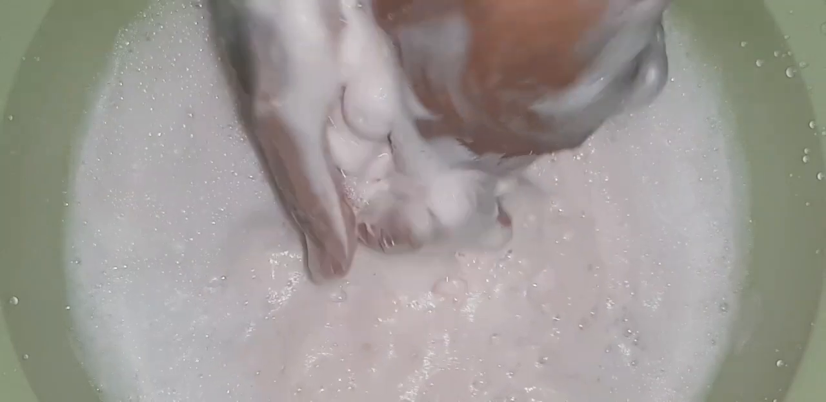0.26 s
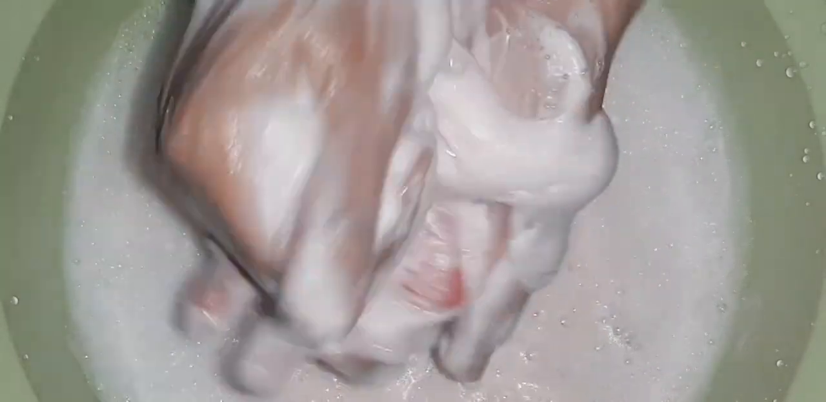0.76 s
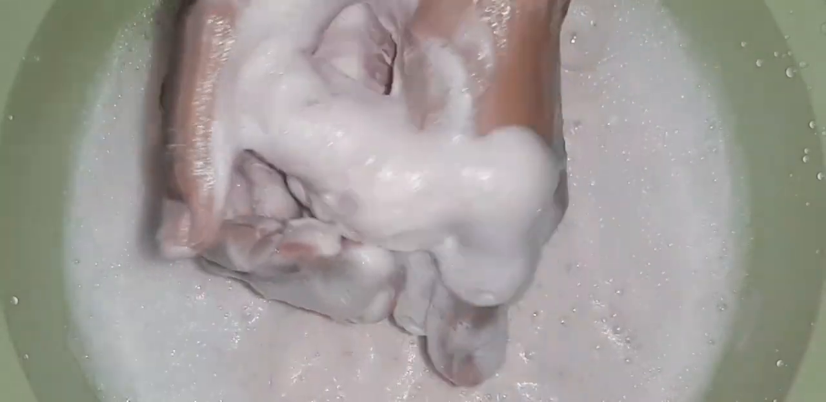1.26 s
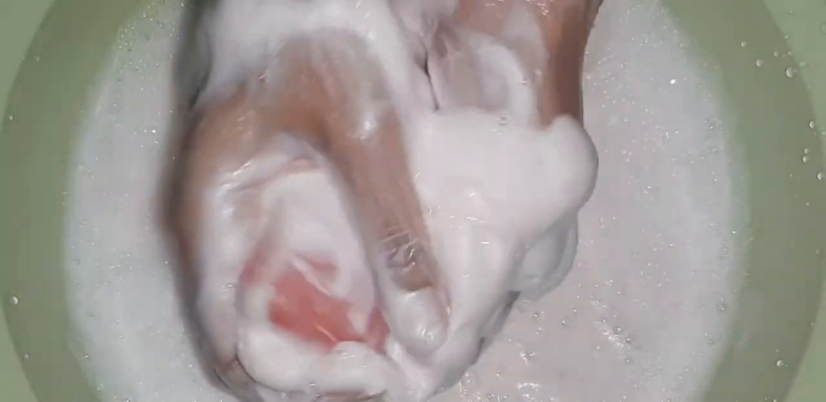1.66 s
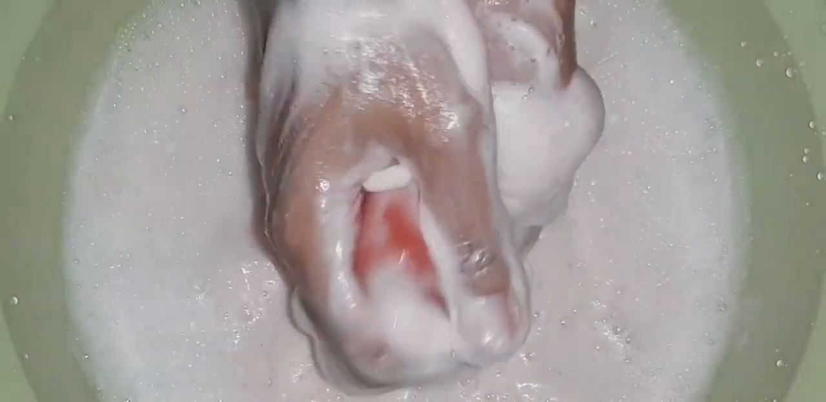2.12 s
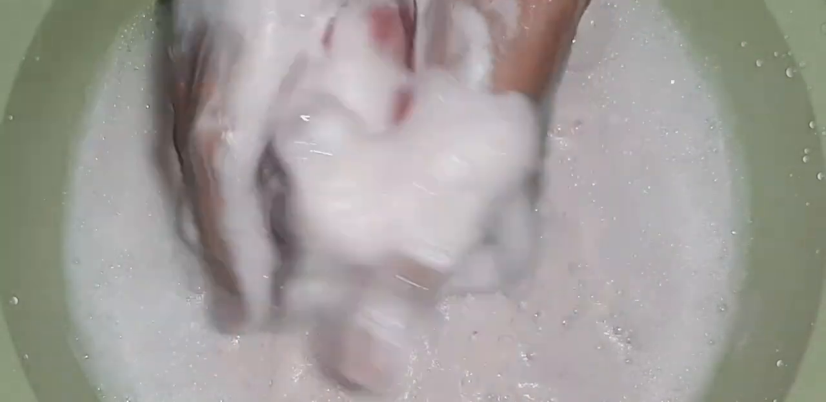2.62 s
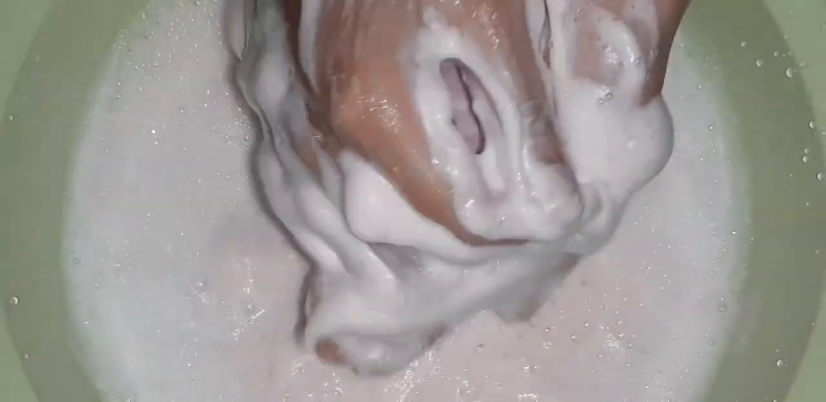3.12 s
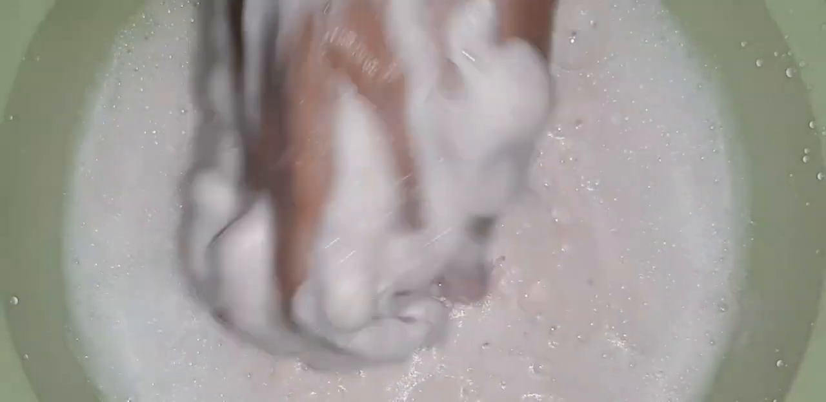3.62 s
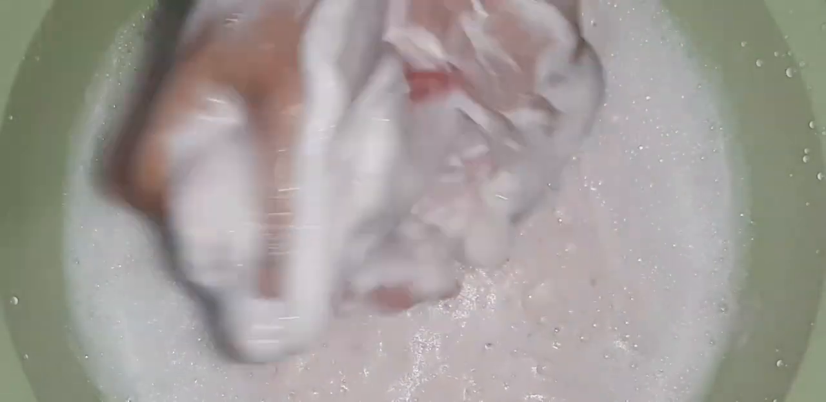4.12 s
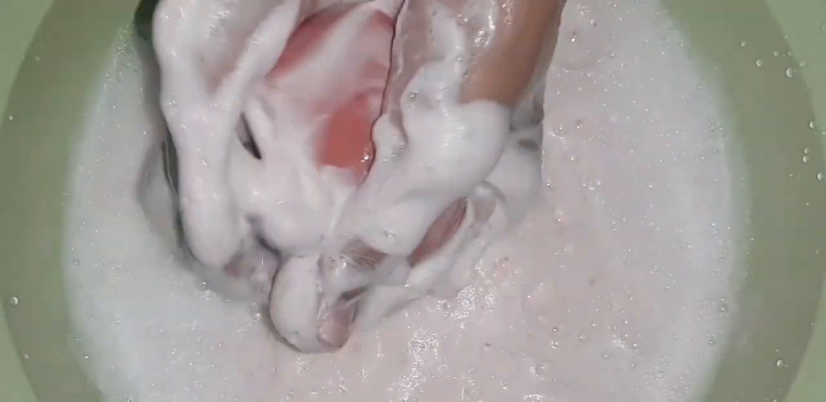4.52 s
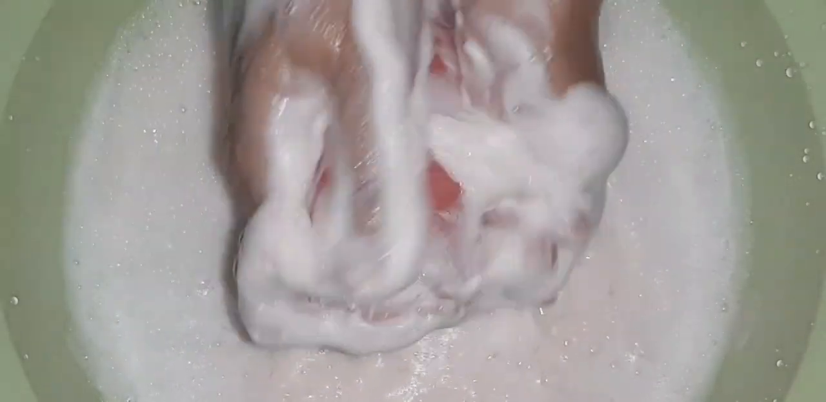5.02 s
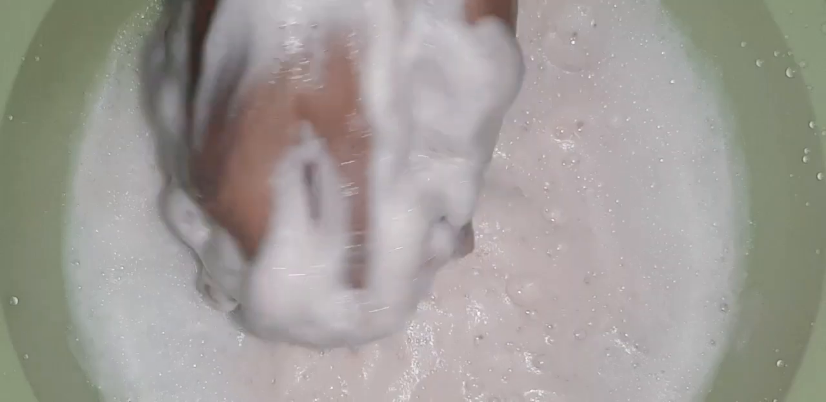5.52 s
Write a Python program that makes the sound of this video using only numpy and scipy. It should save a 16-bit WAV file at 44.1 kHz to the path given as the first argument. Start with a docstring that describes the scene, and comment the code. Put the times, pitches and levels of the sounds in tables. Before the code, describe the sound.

Close, slippery squeezing of lather: squelching bursts, ticking bubbles and crushed-foam crackle above softly sloshing water, in a small quiet room.

```python
"""Wet hands knead a foamy bar of soap over a plastic basin of suds, close to the microphone.
Throughout, a slowly growing fan drone and a thin hiss (both shaped noise) lie behind the hands.
From the first moments squeezes slosh water and crush foam (filtered clicks), and pockets pop (chirps).
From about 1 s wet squelches (paired chirps with a snap) and a thin whistle (gliding noise band) join in.
The hardest spurt, near 4.8 s, throws bright mist; basin and small room ring briefly after each sound."""
import sys
import numpy as np
from scipy import signal
from scipy.fft import rfft, irfft, next_fast_len
from scipy.io import wavfile
from scipy.ndimage import uniform_filter1d

SR = 44100
rng = np.random.default_rng(int(sys.argv[2]) if len(sys.argv) > 2 else 0)


def transcribe(signal):
    """Save signal, clipped to [-1, 1], as a 16-bit WAV file at the path in sys.argv[1]."""
    frames = np.atleast_2d(signal).T
    limited = np.clip(frames, -1, 1)
    pcm = np.round(limited * 32767).astype(np.int16)
    wavfile.write(sys.argv[1], SR, pcm)


N = 254451
TIME = np.arange(N) / SR


def amp(db):
    """Decibels to amplitude."""
    return 10 ** (np.asarray(db) / 20)


def unit(x):
    """Scale to an RMS of one."""
    return x / np.sqrt(np.mean(x ** 2) + 1e-20)


def read(points, hz):
    """Read a frequency curve, interpolating along log frequency."""
    point_hz, value = np.transpose(points)
    return np.interp(np.log(hz + 1), np.log(point_hz + 1), value)


def add(mix, start_s, sound):
    """Lay a sound into the mix, cutting it at the end."""
    part = mix[..., max(round(start_s * SR), 0):][..., :sound.shape[-1]]
    part += sound[..., :part.shape[-1]]


def pan(left_db):
    """Left and right gains that differ by left_db."""
    return amp(np.array([[left_db], [-left_db]]) / 2)


def convolve(x, response):
    """Pass each channel through a response, keeping the scene's length."""
    return signal.oaconvolve(np.atleast_2d(x), np.atleast_2d(response), axes=1)[:, :N]


def colour(x, spectrum, size=4096):
    """Causal, minimum-phase filter of unit energy with the given spectrum."""
    log_gain = np.log(amp(read(spectrum, abs(np.fft.fftfreq(size, 1 / SR)))))
    minimum_phase = np.exp(np.conj(signal.hilbert(log_gain)))
    response = np.fft.ifft(minimum_phase).real[:size // 2]
    return convolve(x, response / np.linalg.norm(response))


# How alike diffuse sound is at left and right: pitch_hz, likeness (0 unrelated, 1 the same)
STEREO_LIKENESS = [(100, 1), (400, 0.75), (800, 0), (1500, 0.12), (4000, 0.11), (15000, 0)]


def ambient():
    """Two channels of white noise, alike in the bass and nearly unrelated in the treble."""
    left, other = rfft(rng.standard_normal((2, N)))
    same = np.clip(read(STEREO_LIKENESS, np.fft.rfftfreq(N, 1 / SR)), -1, 1)
    right = same * left + np.sqrt(1 - same ** 2) * other
    return irfft(np.array([left, right]), N)


def narrow(hz, width_hz):
    """Background noise in one narrow bell-shaped band."""
    band = np.exp(-.5 * ((np.fft.rfftfreq(N, 1 / SR) - hz) / width_hz) ** 2)
    return unit(irfft(rfft(ambient()) * band, N))


def swells(rows, taper):
    """Level curve with one rounded swell a row."""
    level = np.zeros(N)
    for start_s, length_s, level_db, *_ in rows:
        shape = signal.windows.tukey(max(int(length_s * SR), 4), min(taper, 1))
        add(level, start_s, amp(level_db) * shape)
    return level


# Spectrum of the fan's rumble: pitch_hz, relative_level_db (per Hz)
FAN_SPECTRUM = [(25, -62.5), (40, -52.5), (50, -35), (64, -15), (80, -12), (110, -7), (148, 0.5),
                (190, -2.5), (260, -5), (390, -10), (480, -12), (620, -30.5), (1000, -37.5), (2500, -62.5)]


def fan(level_db=-58.5, growth_db_per_s=0.37, hum_hz=147, hum_width_hz=7, hum_db=-6):
    """A fan's low rumble with a wavering hum, a narrow noise band; it slowly grows."""
    hum = amp(hum_db) * narrow(hum_hz, hum_width_hz)  # against the rumble
    drone = unit(colour(ambient(), FAN_SPECTRUM)) + hum
    return drone * amp(level_db + growth_db_per_s * TIME) * pan(2.5)


# Spectrum of the steady hiss: pitch_hz, relative_level_db (per Hz)
HISS_SPECTRUM = [(300, 11), (1000, 3), (2000, -1.5), (2450, 4), (2900, -4.5), (4500, -5.5), (6000, -12),
                 (7000, -6), (8000, -15), (10000, -19.5), (13000, -22), (16000, -25)]


def hiss(level_db=-67.5, sizzle_hz=6900, sizzle_width_hz=330, sizzle_db=-79, flutter=0.29):
    """Steady shaped noise with a high narrow band whose level flutters."""
    wobble = np.exp(flutter * unit(uniform_filter1d(rng.standard_normal(N), size=1200)))
    sizzle = amp(sizzle_db) * unit(narrow(sizzle_hz, sizzle_width_hz) * wobble)
    return amp(level_db) * unit(colour(ambient(), HISS_SPECTRUM)) + sizzle


# A thin whistling hiss that comes and goes: start_s, length_s, level_db, pitch_hz (at both ends)
WHISTLE_SWELLS = [(0.978, .35, -68, 3700), (2.127, 0.33, -67, 3680), (4.1, .33, -74.5, 3760),
                  (4.8, 0.32, -65, 3510)]


def whistle(arch_hz=380, width_hz=680, flicker=0.25):
    """A narrow band of hiss whose pitch arches as it swells and fades."""
    arch = swells([(start_s, length_s, 0) for start_s, length_s, _, _ in WHISTLE_SWELLS], 0.89)
    ends = [(start_s + end, hz) for start_s, length_s, _, hz in WHISTLE_SWELLS for end in (0, length_s)]
    pitch_hz = np.interp(TIME, *np.transpose(ends)) + arch_hz * arch
    # slow complex noise, moved up to the gliding pitch
    smooth = signal.butter(2, width_hz / 2, fs=SR, output="sos")
    noise = rng.standard_normal((2, N)) + 1j * rng.standard_normal((2, N))
    carrier = np.exp(2j * np.pi * np.cumsum(pitch_hz) / SR)
    band = (signal.sosfilt(smooth, noise) * carrier).real
    grain = np.exp(flicker * unit(uniform_filter1d(rng.standard_normal(N), size=300)))
    return unit(grain * band) * swells(WHISTLE_SWELLS, 0.83)


# Tone of the room's reflections: pitch_hz, relative_level_db
ROOM_TONE = [(100, -1.5), (300, -2), (600, -3), (1100, -4.5), (2000, -2), (3400, -2.5), (5000, -5),
             (8000, -5.5), (15000, -3.5)]
# Time each band takes to fall by 60 dB: pitch_hz, t60_s
ROOM_DECAY = [(200, 0.3), (700, 0.31), (1800, 0.19), (4500, 0.28), (9000, 0.23), (15000, 0.058)]


def room(x, gap_s=0.0012, build_s=0.006, size=256):
    """Dense reflections from near walls, each band dying at its own speed."""
    taps = rng.standard_normal((3, SR // 2)) * (rng.random((3, SR // 2)) < .1)
    hz, t, bands = signal.stft(taps, SR, nperseg=size)
    same = np.clip(read(STEREO_LIKENESS, hz), 0, 1)[:, None]
    stereo = np.sqrt(same) * bands[2] + np.sqrt(1 - same) * bands[:2]
    decay_db = read(ROOM_TONE, hz)[:, None] - 60 * t / read(ROOM_DECAY, hz)[:, None]
    tail = signal.istft(stereo * amp(decay_db), SR, nperseg=size)[1]
    tail = tail * np.clip((np.arange(tail.shape[1]) / SR - gap_s) / build_s, 0, 1)
    return convolve(x, tail / np.linalg.norm(tail[0]))


def walls(x, first_s=.002, last_s=0.016, count=24):
    """Early reflections off the forearms, the water and the basin's wall."""
    response = np.zeros(SR // 20)
    arrivals = (rng.uniform(first_s, last_s, count) * SR).astype(int)
    response[arrivals] = rng.choice([-1, 1], count) / np.sqrt(count)
    return convolve(x, response)


# Ringing modes of the basin and the nook it stands in: pitch_hz, relative_level_db, t60_s
BASIN_MODES = [(268, -5, 0.6), (360, -25, 0.55), (389, -3, 0.17), (441, -5, 0.57), (573, -14, 0.48),
               (613, -3.5, 0.051), (632, 1, 0.2), (668.5, 4.5, 0.33), (704, -3.5, 1), (747, -9, 0.55),
               (890, -31, 0.26), (895, -8, 0.092), (980, -26, 0.13), (1010, -20, 0.28), (1180, -22, 0.22),
               (1400, -9, 0.14), (1450, -34, 0.11), (1596, -20, 0.1)]


def basin(x, delay_s=0.00412):
    """The air in and around the basin rings on: decaying sines, alternately flipped."""
    age = np.maximum(np.arange(SR // 3) / SR - delay_s, 0)
    response = np.zeros(len(age))
    for k, (hz, level_db, t60_s) in enumerate(BASIN_MODES):
        ring = amp(level_db - 60 * age / t60_s) * np.sin(2 * np.pi * hz * age)
        evening = 2 * np.log(1000) / (t60_s * SR)  # long modes build up no louder than short ones
        response += (-1) ** k * ring * evening
    return convolve(x.mean(0), response)


# How far the right port lags the left: pitch_hz, lag_rad
RIGHT_PORT_LAG = [(100, .02), (2000, 1.06), (3000, 1.44), (4200, 1.52), (6000, 2.2), (8500, 2.9),
                  (16000, 9.7)]


def ports(x):
    """Sound from the hands reaches the right microphone port a little later."""
    size = next_fast_len(N + 512)
    lag_rad = read(RIGHT_PORT_LAG, np.fft.rfftfreq(size, 1 / SR))
    right = irfft(rfft(x[1], size) * np.exp(-1j * lag_rad), size)[:N]
    return np.array([x[0], right])


def clicks(per_s, spread_db):
    """Sparse random clicks, most small and a few large."""
    size = amp(spread_db * np.minimum(rng.exponential(1, N), 3.5))
    return size * rng.choice([-1, 1], N) * (rng.random(N) < per_s / SR)


def crackle(per_s, spread_db):
    """Bursting foam cells: some reach both sides alike, some only one."""
    sides = np.array([clicks(per_s, spread_db), clicks(per_s, spread_db)])
    return unit(clicks(per_s, spread_db) + sides)


def bubbles(per_s, spread_db, cycles=0.68, low_hz=750, high_hz=2400, count=16):
    """Small bubbles of many sizes, each a short ring that peaks after a set share of a cycle."""
    t, out = np.arange(SR // 50) / SR, np.zeros((2, N))
    for k, hz in enumerate(np.geomspace(low_hz, high_hz, count)):
        age = t * hz / cycles
        ring = age * np.exp(-age) * np.sin(2 * np.pi * hz * t)
        side = pan(2 + 2 * (-1) ** k)  # sizes alternate between left and centre
        out += convolve(clicks(per_s / count, spread_db), ring) * side
    return unit(out)


# Squeezes of the hands: start_s, length_s, relative_force_db, foam_db (watery -, foamy +)
HAND_SQUEEZES = [(0.09, 0.5, -75.5, 5.5), (1.04, 0.32, -71, 2), (2.003, 0.49, -65.5, 2),
                 (2.423, 0.78, -75, 0), (3.11, 0.77, -67, -0.5), (3.69, 0.73, -68, -4.5),
                 (4.617, 0.14, -81.5, 19.5), (5.096, 0.33, -67, 4.5), (5.38, 0.2, -66, -8.5),
                 (5.54, .26, -68, 4)]


def grip(foaminess, power, peak=0.4):
    """Level of one part of the lather: each squeeze tightens, to its peak share, and lets go."""
    level = np.zeros(N)
    for start_s, length_s, force_db, foam_db in HAND_SQUEEZES:
        hold = np.interp((TIME - start_s) / length_s, [0, peak, 1], [0, 1, 0])
        level += amp(force_db + foaminess * foam_db) * hold ** power
    return level


# Lather forced out between the fingers: start_s, length_s, relative_level_db
LATHER_SPURTS = [(.138, 0.012, -65), (.345, 0.028, -64), (.815, 0.022, -59), (.862, 0.079, -57.5),
                 (1.035, 0.018, -50), (1.447, 0.012, -50), (1.462, 0.049, -55), (2.2, 0.049, -67),
                 (2.56, 0.0041, -49), (2.768, 0.014, -42), (3.364, 0.013, -55.5), (3.424, 0.0065, -53),
                 (3.496, 0.012, -56), (3.723, .007, -56.5), (4.02, 0.039, -64.5), (4.18, 0.028, -63.5),
                 (4.627, 0.0039, -52.5), (4.772, 0.011, -52), (4.808, 0.012, -33), (4.962, .016, -55),
                 (5.183, 0.0065, -49), (5.285, .016, -57), (5.43, 0.057, -64)]
# Spectrum of the sloshing water: pitch_hz, relative_level_db (per Hz)
SLOSH_SPECTRUM = [(40, -63), (120, -39), (230, 5.5), (340, 7.5), (440, 2.5), (580, -6.5), (1000, -34.5),
                  (4000, -63)]
# Spectrum of the crushed foam: pitch_hz, relative_level_db (per Hz)
FOAM_SPECTRUM = [(400, -16), (1200, 4.5), (2400, 1.5), (4300, 2), (6000, -3.5), (8000, -8), (11000, -27.5),
                 (13500, -38), (16000, -53)]


def lather(rest_slosh_db=-64, wetter_db_per_s=1, slosh_db=3, bubbles_db=-3, fizz_db=-6.0,
           spurt_db=-1, froth_db=-3, rest_bubbles_db=-82, rest_fizz_db=-83):
    """Kneading sloshes water, bursts bubbles and crushes foam; spurts rush the last two."""
    rest_slosh = amp(rest_slosh_db + wetter_db_per_s * TIME)  # more as the hands get wetter
    slosh = rest_slosh + amp(slosh_db) * grip(foaminess=-0.75, power=0.82)
    bubbling = amp(rest_bubbles_db) + amp(bubbles_db) * grip(foaminess=0, power=0.46)
    fizz = amp(rest_fizz_db) + amp(fizz_db) * grip(foaminess=0.97, power=0.61)
    spurts = swells(LATHER_SPURTS, 0.94)
    splashes = 0.43 * ambient() + unit(clicks(260, 3.46))
    water = unit(colour(splashes, SLOSH_SPECTRUM)) * slosh * pan(2.0)
    foam = crackle(600, 4.1) * fizz + crackle(3200, 0.95) * spurts * amp(spurt_db)
    froth = bubbles(130, 5.4) * bubbling + bubbles(1100, 1.2) * spurts * amp(froth_db)
    return water + froth + colour(foam, FOAM_SPECTRUM) * pan(0.71)


# Spectrum of the fine spray: pitch_hz, relative_level_db (per Hz)
MIST_SPECTRUM = [(4000, -46), (7500, -2), (9500, 4), (12000, -5), (16000, -22)]


def mist(db=-51):
    """Fine bright spray: squaring the spurts' force leaves mainly the hardest."""
    force = swells(LATHER_SPURTS, 0.41)
    spray = crackle(5700, 2.1) * amp(db) * (force / force.max()) ** 2
    return colour(spray, MIST_SPECTRUM) * pan(7.9)


def chirp(db, hz, peak_s, glide):
    """An air pocket rings briefly, its pitch rising as it opens."""
    age = np.arange(SR // 16) / SR / peak_s
    turns = np.cumsum(hz * (1 + glide * (np.minimum(age, 4) - 2))) / SR
    return amp(db) * age * np.exp(1 - age) * np.sin(2 * np.pi * turns)


def snap(snap_s=0.00078, rise_s=0.00063, shreds_db=-9, shreds_s=0.0038, shreds_per_s=900):
    """A soap film tears, and the foam cells beside it burst too."""
    t = np.arange(SR // 16) / SR
    neighbours = (rng.random(len(t)) < shreds_per_s / SR) * np.sqrt(SR / shreds_per_s)
    tearing = np.exp(-t / snap_s) + amp(shreds_db) * neighbours * np.exp(-t / shreds_s)
    tear = rng.choice([-1, 1], (3, len(t))) * tearing * (1 - np.exp(-t / rise_s))
    return 1.09 * tear[:2] + tear[2]  # each side's own part, and a shared part


# Single air pockets popping in the lather:
# start_s, ring_db (before panning), pitch_hz, cycles (to the peak: few for a tick, many for a drip)
LATHER_POPS = [(.092, -56, 885, 0.34), (0.2931, -50.5, 1010, 0.53), (0.352, -45, 990, .4),
               (0.6833, -47, 1830, 0.2), (0.8694, -39.5, 2070, 0.61), (0.8932, -43, 1360, 1),
               (1.0223, -35.5, 365, 1.23), (1.1848, -37, 1380, 0.64), (1.2633, -44, 930, 0.38),
               (1.2764, -41.5, 1880, 0.82), (1.4703, -40, 1100, 0.81), (1.4998, -39.5, 1610, .4),
               (1.5048, -35, 1560, .3), (1.7999, -45.5, 1310, 0.67), (1.822, -51.5, 1240, 1.5),
               (1.97, -39, 1540, 0.34), (2.0255, -47, 1110, 0.45), (2.0545, -36.5, 1800, 0.55),
               (2.0877, -37.5, 1060, 0.39), (2.1765, -42.5, 1010, .5), (2.3222, -44, 1320, 2.4),
               (2.3347, -41, 1140, 0.25), (2.4108, -36, 830, 0.23), (2.487, -36.5, 775, 0.27),
               (2.5164, -46.5, 860, 1.2), (2.5619, -36.5, 2400, 0.88), (2.881, -37.5, 1020, 1.1),
               (2.9003, -42, 1350, 1.2), (2.9338, -40.5, 1470, .4), (2.9916, -49, 1400, 0.74),
               (3.165, -44.5, 1500, 0.4), (3.2178, -47, 1650, 0.64), (3.3439, -50.5, 1010, 1.8),
               (3.423, -42, 449, 2), (3.5785, -44, 825, 0.78), (3.5993, -39, 487, 0.12),
               (3.697, -44, 1270, 0.64), (3.8277, -41.5, 1970, 0.42), (3.8357, -39, 1060, 0.5),
               (3.8667, -42, 463, 0.24), (4.0257, -42, 570, 0.79), (4.0602, -43, 1460, 0.74),
               (4.2839, -43.5, 580, 0.85), (4.8224, -41, 470, 1.3), (4.9188, -38.5, 1095, 0.17),
               (4.935, -33.5, 1300, 0.78), (4.9687, -38.5, 1310, 0.58), (4.9792, -33.5, 1680, 0.56),
               (5.1305, -41, 1190, .55), (5.185, -35, 1430, 0.47), (5.2648, -40, 1150, 0.38),
               (5.2967, -42.5, 1380, 1.2), (5.436, -37, 1840, 0.46), (5.4681, -35.5, 1210, 0.19),
               (5.6236, -38.5, 550, 1.4), (5.6334, -37, 614, 0.15)]
# Squelches: the hollow between the palms and a narrow gap between the fingers ring together:
# start_s, hollow_db, hollow_hz, gap_db, gap_hz, peak_s (time to the peak), film_db (relative snap)
PALM_SQUELCHES = [(1.0358, -26, 444, -30.5, 2156, 0.0012, -33),
                  (1.0372, -21.5, 524, -20.5, 898, 0.0021, -27.5),
                  (1.463, -35.5, 307, -52, 1060, 0.0044, -43),
                  (2.3895, -29.5, 860, -33.5, 2140, 0.0002, -45),
                  (2.7696, -30, 670, -30.5, 2080, 0.00069, -49),
                  (2.7765, -22, 750, -31, 2190, 0.00021, -55),
                  (3.8555, -33.5, 376, -39, 1360, 0.00075, -57),
                  (4.2985, -37, 490, -46.5, 1510, 0.00091, -66),
                  (4.809, -39, 600, -27.5, 1660, 0.0008, -31.5),
                  (4.8138, -22, 534, -21.5, 1510, 0.0013, -33),
                  (4.818, -24.5, 380, -29.5, 1690, 0.0014, -37), (5.1433, -22, 440, -24, 1130, 0.001, -41),
                  (5.461, -33.5, 442, -34, 1440, 0.00096, -61)]


def bursts(pop_snap_db=-19):
    """Gather rings (start_s, level_db, pitch_hz, peak_s) and film snaps (start_s, relative_db)."""
    rings = [(start_s, db, hz, cycles / hz) for start_s, db, hz, cycles in LATHER_POPS]
    snaps = [(start_s, db + pop_snap_db) for start_s, db, hz, cycles in LATHER_POPS]
    for start_s, hollow_db, hollow_hz, gap_db, gap_hz, peak_s, film_db in PALM_SQUELCHES:
        rings += [(start_s, hollow_db, hollow_hz, peak_s), (start_s, gap_db, gap_hz, peak_s)]
        snaps += [(start_s, film_db)]
    return rings, snaps


# Spectrum of a tearing film: pitch_hz, relative_level_db (per Hz)
SNAP_SPECTRUM = [(300, -12), (900, 0.5), (2000, 3.5), (3000, 7), (4300, 5.5), (6000, -7.5), (7800, -3),
                 (10000, -31), (13000, -30), (16000, -62)]


def pockets(left_db=4.0, glide=0.007, snap_db=2.5, cluster_db=-11, cluster_top_db=-44,
            cluster_s=.013, lead_s=0.003852, cluster_hz=1350, cycles=0.46, count=4):
    """Pops and squelches snap and ring; smaller bubbles burst just before and after each ring."""
    rings, snaps = np.zeros((2, N)), np.zeros((2, N))
    ringing, snapping = bursts()
    for start_s, film_db in snapping:
        add(snaps, start_s, amp(film_db + snap_db) * snap())
    for start_s, db, hz, peak_s in ringing:
        side = pan(left_db * min(hz / 1100, 1) ** 3)  # long waves reach both sides alike
        add(rings, start_s, chirp(db, hz, peak_s, glide) * side)
        small_db = min(db + cluster_db, cluster_top_db)
        for when, size in rng.random((count, 2)):
            small_hz = np.sqrt(hz * cluster_hz) * 2 ** (size - .5)
            small = chirp(small_db, small_hz, cycles / small_hz, glide)
            add(rings, start_s - lead_s + when * cluster_s, small * pan(left_db))
    rings = signal.sosfilt(signal.butter(2, 190, "highpass", fs=SR, output="sos"), rings)
    return rings + colour(snaps, SNAP_SPECTRUM) * pan(0.24)


def scene(basin_db=2.0, walls_db=-17, room_db=-11):
    """The hands close by, with the basin and the room around them."""
    background = fan() + hiss() + whistle()
    hands = lather() + mist() + pockets()
    space = amp(basin_db) * basin(hands) + amp(walls_db) * walls(hands) + amp(room_db) * room(hands)
    return background + space + ports(hands)


def record(dry, low_hz=55, edge_hz=15750):
    """The microphone sheds deep bass; then a steep low-pass limits the treble."""
    heard = signal.sosfilt(signal.butter(4, low_hz, "highpass", fs=SR, output="sos"), dry)
    band_limit = signal.firwin(511, edge_hz, window=("kaiser", 9), fs=SR)
    return signal.oaconvolve(heard, band_limit[None], "same")


dry = scene()
out = record(dry)
transcribe(out)
```